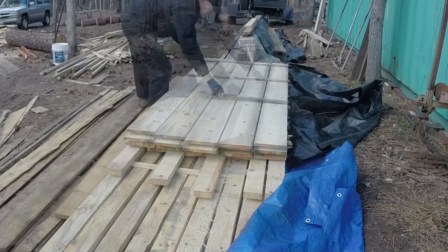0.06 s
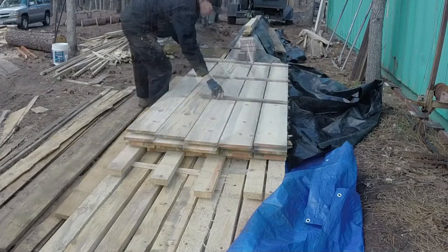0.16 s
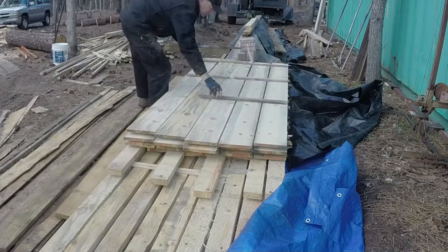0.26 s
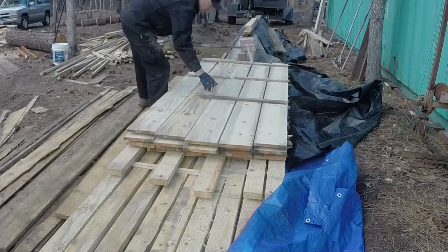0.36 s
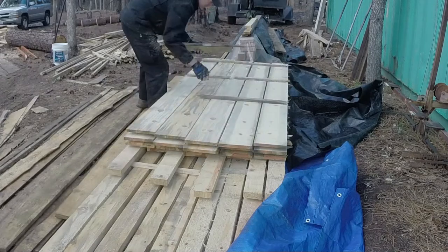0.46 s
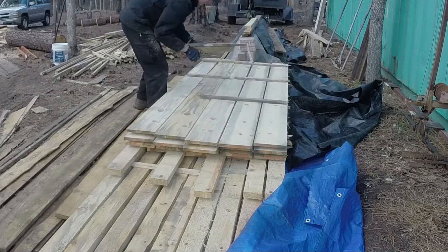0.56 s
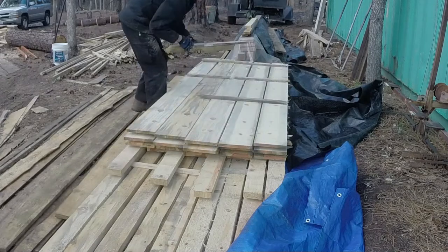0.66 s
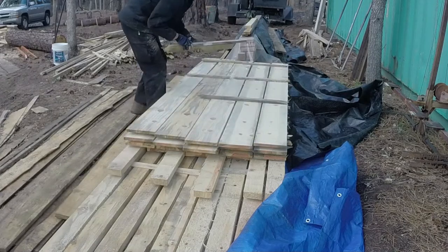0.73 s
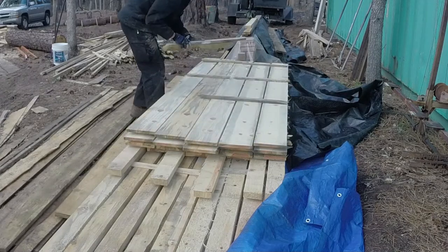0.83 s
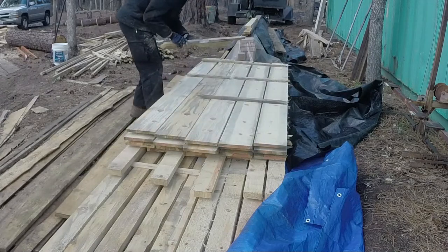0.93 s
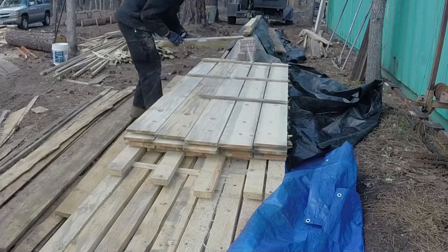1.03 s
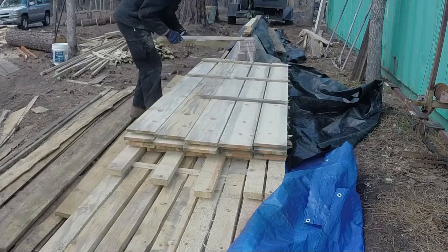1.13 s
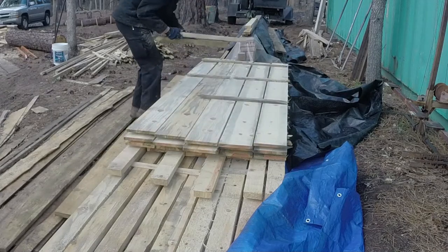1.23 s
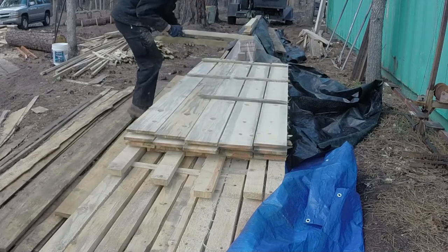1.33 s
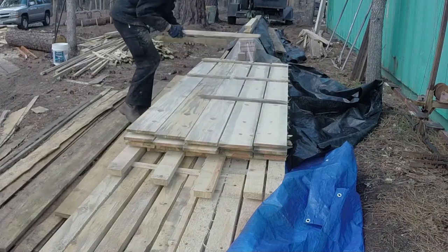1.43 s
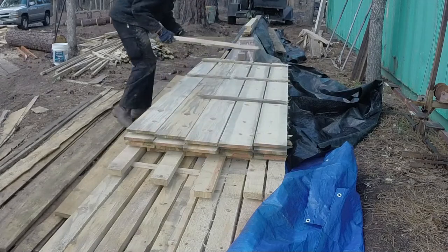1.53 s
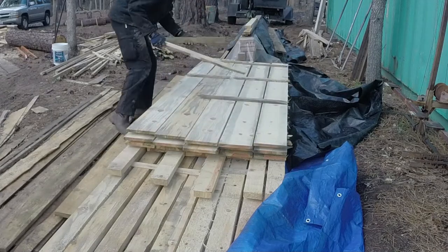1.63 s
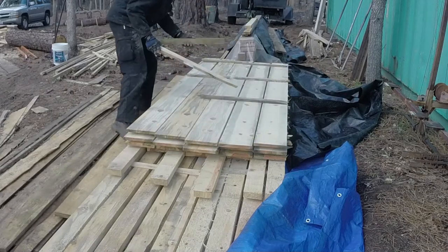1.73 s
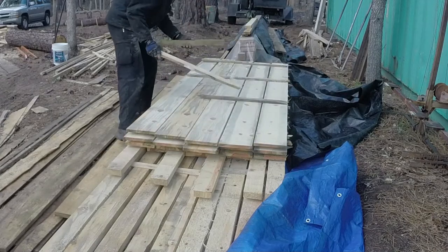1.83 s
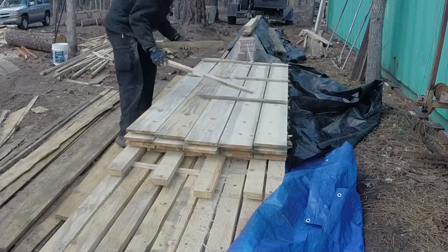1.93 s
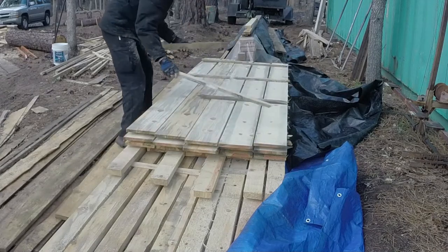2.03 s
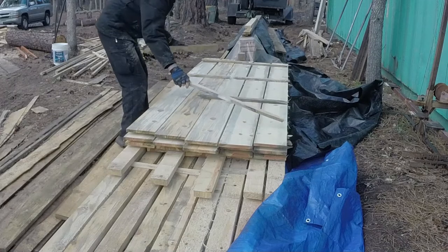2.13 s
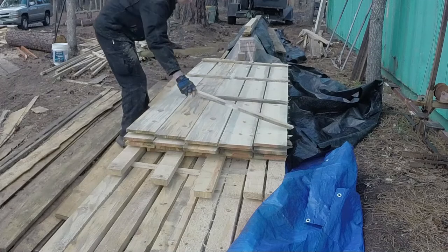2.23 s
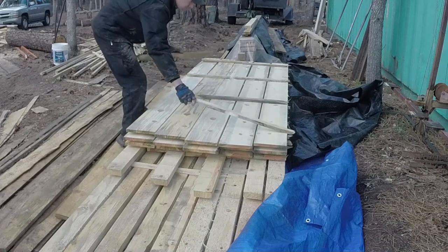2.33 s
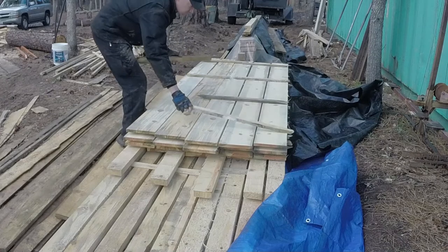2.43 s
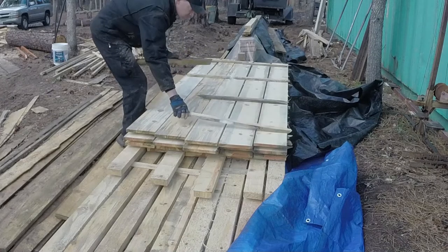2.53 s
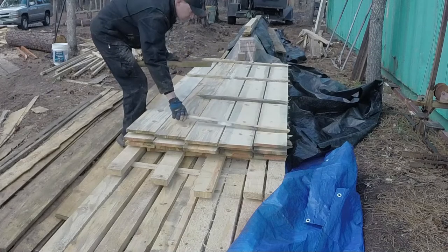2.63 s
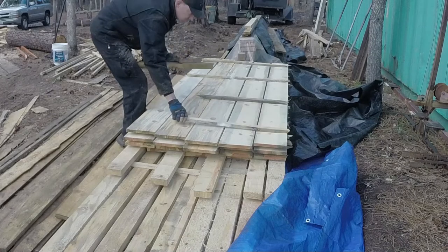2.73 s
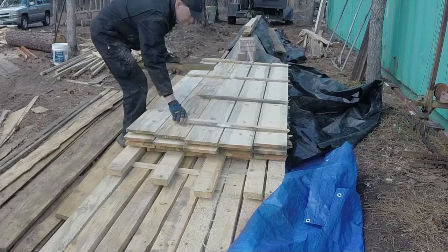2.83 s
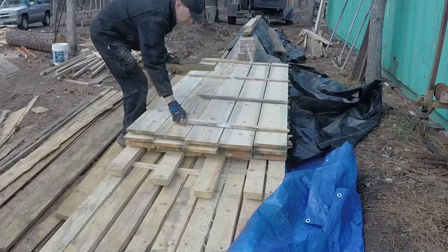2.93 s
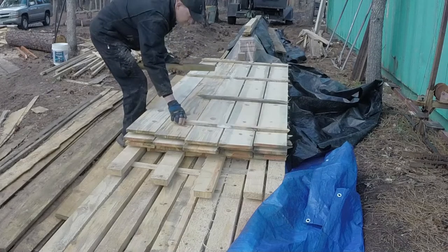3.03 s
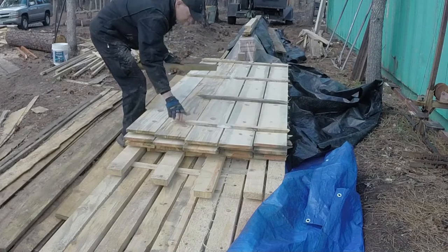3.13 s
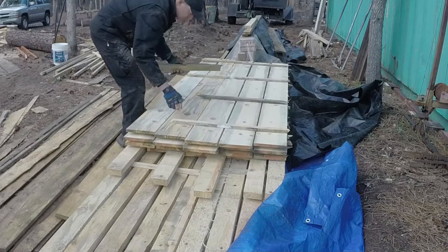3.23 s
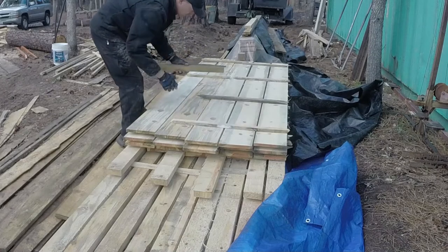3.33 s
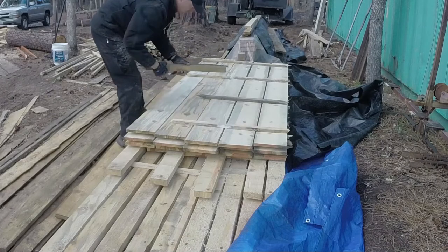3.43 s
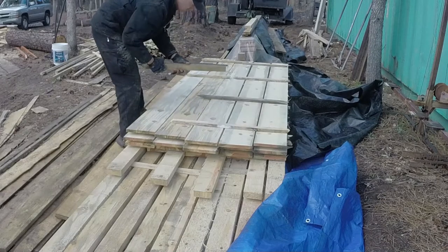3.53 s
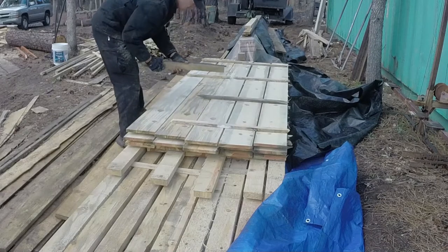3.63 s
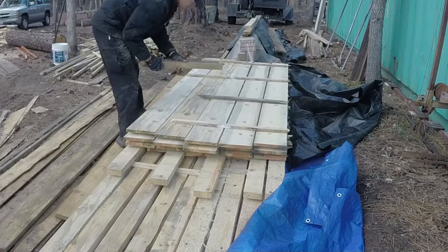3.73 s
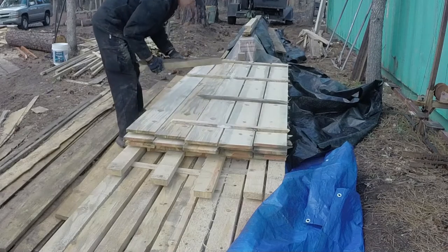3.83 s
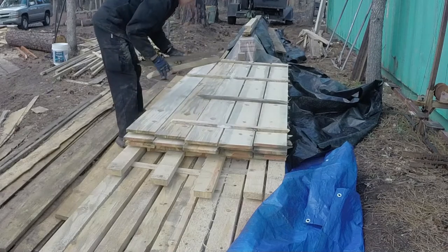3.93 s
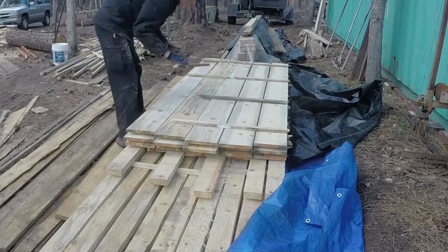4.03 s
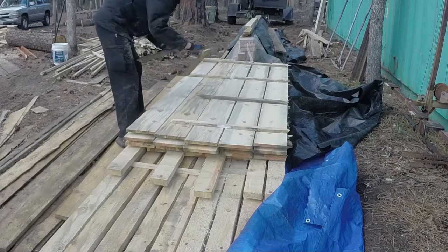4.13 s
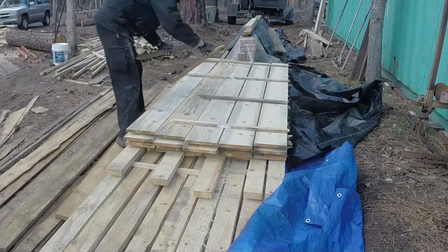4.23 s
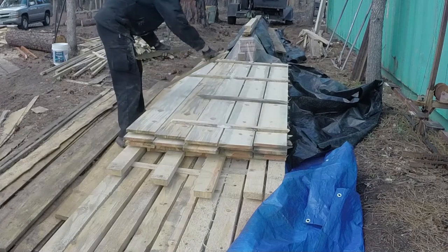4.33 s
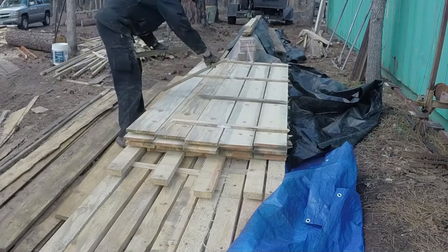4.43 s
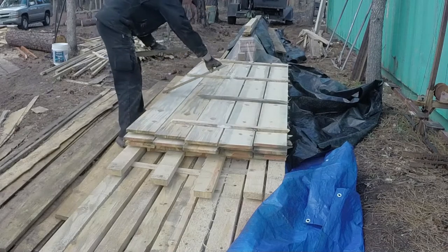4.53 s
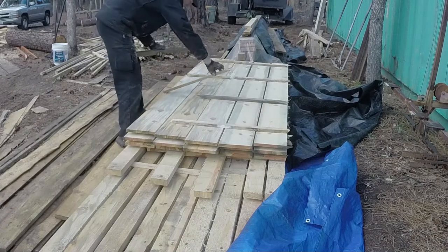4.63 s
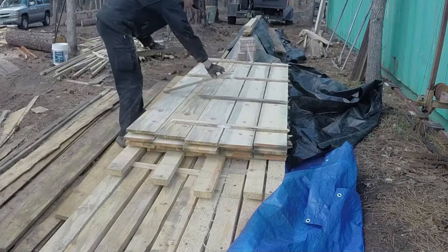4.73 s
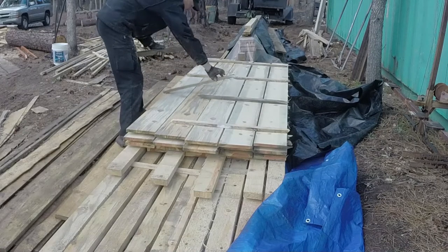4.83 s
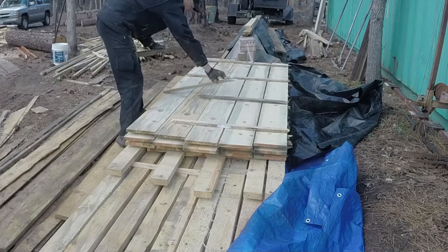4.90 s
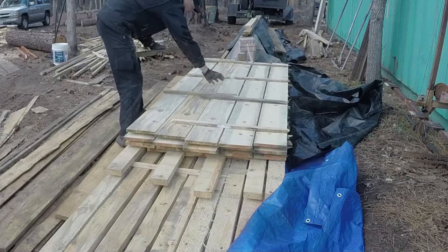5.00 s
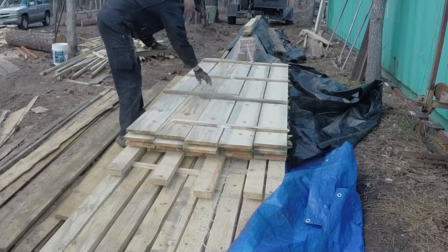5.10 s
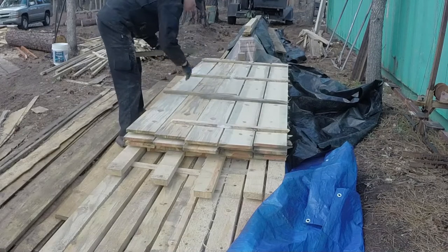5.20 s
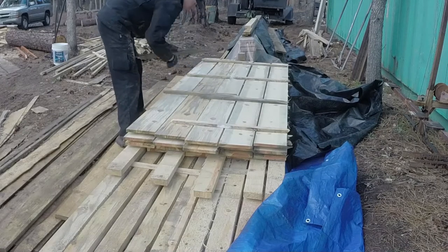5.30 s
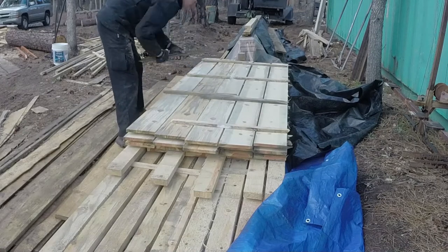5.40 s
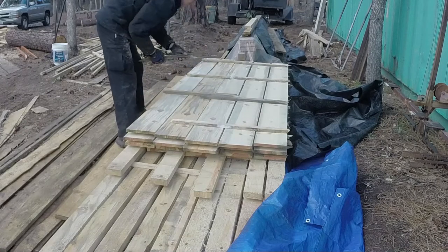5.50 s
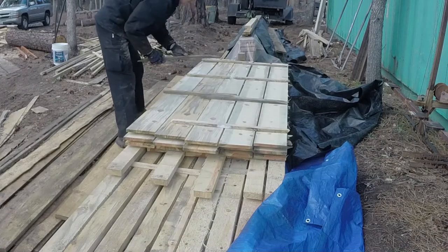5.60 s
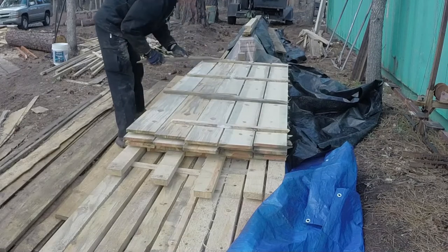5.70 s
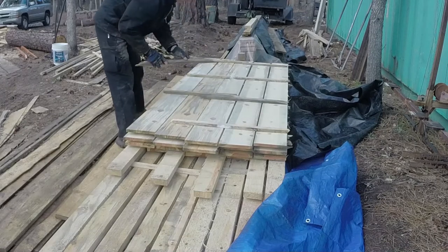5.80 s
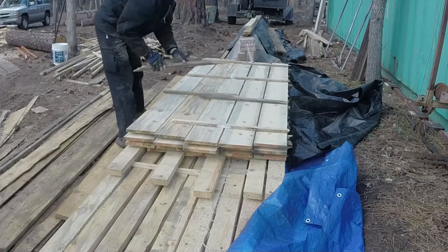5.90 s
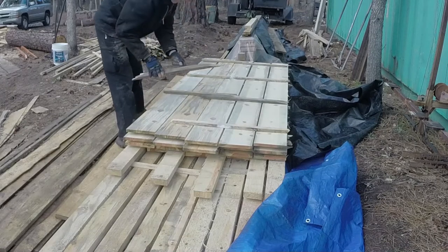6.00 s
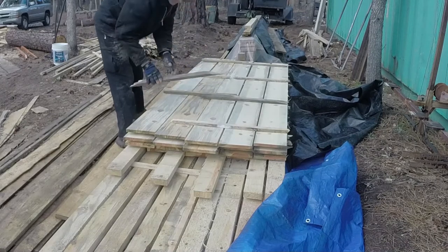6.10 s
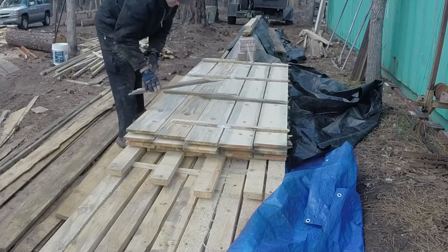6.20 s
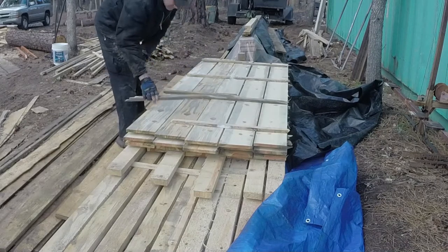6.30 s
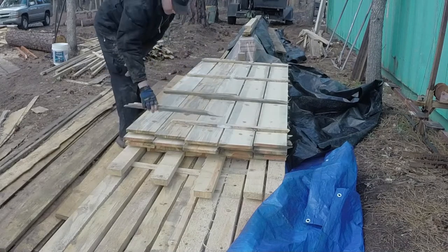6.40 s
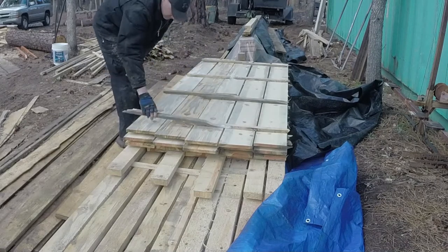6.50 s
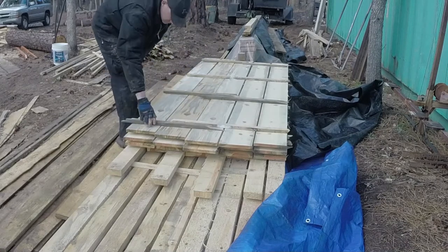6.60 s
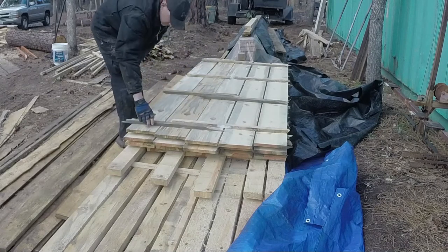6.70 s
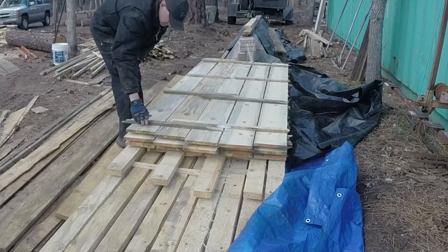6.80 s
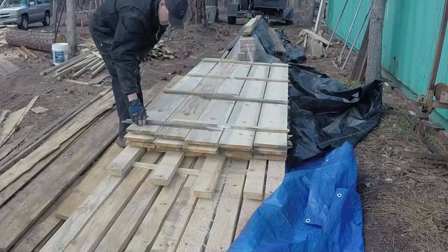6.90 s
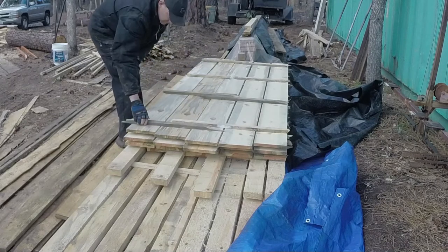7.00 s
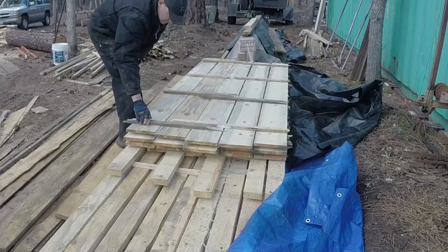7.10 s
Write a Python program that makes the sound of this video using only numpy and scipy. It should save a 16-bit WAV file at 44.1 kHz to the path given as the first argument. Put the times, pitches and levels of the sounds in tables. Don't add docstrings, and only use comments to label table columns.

```python
import sys
import numpy as np
from scipy import signal
from scipy.fft import rfft, irfft
from scipy.io import wavfile
from scipy.ndimage import uniform_filter1d

SR = 44100
rng = np.random.default_rng(int(sys.argv[2]) if len(sys.argv) > 2 else 0)


def inscribe(sig):
    pcm = np.round(np.clip(np.atleast_2d(sig).T, -1, 1) * 32767)
    wavfile.write(sys.argv[1], SR, pcm.astype(np.int16))


def magnitude_from_level(level_db):
    exponent = np.asarray(level_db, float) / 20
    return 10 ** exponent


N = 315315

# modes_db, scatter_db (against the push), scatter_t60_s, left_minus_right_db, left_late_samples
STRIP_PRESSED = ([(.2438, -36, .6), (.2455, -13, 0.45), (.2515, -19, 0.8), (.2585, -33, .5, 400),
                 (.266, -26, 0.4, 680)], [(35, -56), (70, -6), (388, -1.5), (669, 0), (935, -19.5),
                 (1110, -20), (3000, -43), (11000, -94)], [(133, -2, 0.16), (301, 0, .1), (441, -3, .11),
                 (668, -7, .07), (1012, -22, .12), (1314, -26, .08), (1572, -28, .1), (2013, -34, .065)],
                 (-7, -6, 0.15, -2.3, -1.5))
STRIP_DROPPED = ([(2.0166, -26, .08, 3600), (2.0177, -15, 0.15, 1200), (2.0198, -12.5, 1.2),
                 (2.031, -25, 0.2, 1200), (2.0455, -20, 0.4, 650), (2.059, -31, .3, 900)], [(35, -59),
                 (90, -15), (300, -2), (520, -8), (1250, -14), (1780, -25), (4200, -25), (9000, -80)],
                 [(200, -11, .15), (264, -2, 0.14), (404, 0, 0.09), (538, -6, 0.15), (727, -12, 0.12),
                 (845, -12, 0.058), (1066, -26, .1), (1238, -24, .08), (1960, -28, .074), (2471, -32, .1),
                 (2832, -33, .064)], (-6, -9, 0.18, -1, -8.5))
STRIP_NUDGED = ([(3.081, -39, .8), (3.0855, -32, 0.5), (3.0925, -37, .5, 750), (3.122, -34.5, 0.5, 600),
                (3.135, -40, .7)], [(35, -49), (60, -11), (135, 4), (521, -0.5), (900, -7), (1190, -33),
                (4000, -55), (5500, -97)], [(124, -2, .15), (301, -3, 0.15), (484, -4, .064),
                (748, -5, 0.1), (1017, -14, 0.14)], (-2, 1, 0.13, -2, 0.5))
STRIP_TOUCHED = ([(4.5542, -34, 0.7), (4.5578, -34, .3, 500), (4.574, -38, 0.9), (4.582, -42, .5, 450)],
                 [(35, -46), (60, -9), (249, -6), (420, -10), (643, -12.5), (930, -29), (1600, -30),
                 (6000, -96)], [(121, -8, .15), (237, 0, 0.2), (517, -12, .12), (634, -10, 0.07),
                 (1195, -28, .1), (1513, -12, 0.04)], (-3, -4, 0.18, -1.5, 1.5))
STRIP_SLAPPED = ([(5.0763, -6, 0.22), (5.0815, -7, .1, 1500), (5.0862, -9, .12, 1350),
                 (5.0895, -10.5, .5, 600), (5.095, -13, .4, 700), (5.117, -23, 0.5, 650),
                 (5.129, -30, .2, 1400)], [(35, -60), (260, -4), (602, -10), (938, -15.5), (1530, -19),
                 (3000, -24), (5000, -50), (15000, -70)], [(150, -10, .12), (240, -5, .15), (330, -5, .08),
                 (619, -3, 0.12), (716, -4, 0.11), (877, -15, .12), (1012, -8, 0.06), (1130, -14, 0.12),
                 (1362, -2, .07), (1486, -2, .075), (1690, -6, .07), (2062, -25, 0.12), (2300, -28, .08),
                 (2896, -25, .057)], (-8, -11, 0.16, -2, 0.9))
STRIP_SLID = ([(6.6643, -13, 0.35), (6.668, -19, .2, 1100), (6.6755, -20, 0.2, 850), (6.6805, -20, .3, 680),
              (6.686, -21, 0.15), (6.6915, -27, .12, 1300), (6.6995, -26, 0.15, 1000), (6.7425, -29, .85)],
              [(35, -70), (70, -20), (379, -9), (694, -5), (1500, -13), (2570, -20), (3250, -22),
              (3800, -70)], [(226, -14, .15), (301, -10, .13), (382, -6, 0.15), (565, -4, .06),
              (684, -6, 0.1), (829, -10, 0.1), (1007, -7, 0.11), (1303, -9, 0.11), (1420, -20, 0.12),
              (1900, -24, .08), (2579, -20, 0.1)], (-8, -5, 0.115, -2, 1.3))
KNOCKS = [STRIP_PRESSED, STRIP_DROPPED, STRIP_NUDGED, STRIP_TOUCHED, STRIP_SLAPPED, STRIP_SLID]

# start_s, peak_db, pitch_hz, t60_s
TAPS = [
    (.785, -52, 920, 0.044),
    (.895, -41, 314, .03),
    (5.0765, -25, 109.6, 0.11),
    (1.945, -52, 650, .03),
    (2.402, -44.5, 324, 0.034),
    (3.49, -55.5, 600, .04),
    (4.433, -51.5, 350, 0.037),
    (6.403, -54, 420, .04),
    (6.611, -51.5, 1870, 0.041),
    (7.095, -56.5, 818, 0.021),
]
# start_s, peak_db, pitch_hz
THUDS = [(0.558, -48, 57.3), (0.635, -47, 99.6), (0.655, -40.5, 130), (0.707, -36.5, 70.0),
         (0.779, -42, 162), (1.028, -46.5, 52), (1.439, -40.5, 69.6), (1.582, -46.5, 74), (2.15, -33, 58.7),
         (2.172, -45, 51.7), (2.32, -49.5, 53), (3.326, -47, 68), (3.355, -44, 229), (3.479, -49, 119),
         (3.594, -42.5, 88.6), (3.999, -51, 88.8), (4.09, -47, 99), (4.248, -39.5, 104), (4.432, -42, 58.4),
         (5.465, -35.5, 83), (5.868, -48, 70.6), (5.897, -48.5, 72), (6.169, -44.5, 168),
         (6.232, -42.5, 70), (6.312, -36, 87), (6.344, -47, 50.6), (6.429, -41, 85), (6.519, -50, 56.5)]
# start_s, peak_db, pitch_hz, t60_s
TICKS = [(.325, -62, 4000, .02), (.41, -62, 5200, .01), (.422, -61, 7500, .01), (.724, -61, 9400, .015),
         (0.9333, -58, 8500, .024), (2.0168, -44, 5200, .015), (2.039, -55, 6500, .02),
         (2.103, -51, 3250, .01), (2.1035, -52, 9500, .02), (2.1809, -49, 3860, .015),
         (2.187, -55, 5960, .02), (2.4004, -58, 8000, .02), (3.0864, -45, 5800, .024),
         (3.0866, -55, 10500, .02), (3.3513, -44, 7700, .024), (3.5428, -54, 9000, .04),
         (3.5887, -56, 6900, .012), (3.589, -58, 3600, .012), (3.615, -60, 7000, .03),
         (3.724, -60, 3200, .01), (3.736, -61, 4600, .01), (3.7993, -56, 6550, .02),
         (3.8142, -51, 8400, .024), (4.4802, -55, 6740, .02), (4.817, -57, 8340, .02),
         (4.9186, -53.5, 6400, .02), (4.999, -46, 5940, .015), (5.0765, -39, 5000, .025),
         (5.077, -43, 8500, .03), (5.0772, -52, 12500, .025), (5.3901, -59, 3560, .02),
         (5.4171, -49, 5890, .015), (6.1509, -53, 3700, .02), (6.17, -60.5, 7750, .02),
         (5.475, -61, 12200, .024), (5.61, -60, 8900, .024), (6.6109, -53, 8760, .024),
         (6.7456, -46, 5800, .024)]
# peak_s, rise_s, fall_s, level_db
GRATE_SLIPS = [
    [(3.803, .003, 0.036, -69), (3.85, .012, .05, -69), (3.892, 0.05, .005, -65)],
    [(6.612, .001, .02, -60), (6.667, .001, .004, -43), (6.675, .002, .005, -33),
     (6.694, 0.013, 0.0025, -38), (6.705, 0.0046, 0.035, -55.5)],
]
# start_s, length_s, top_hz, end_hz, level_db
SQUEAKS = [(2.57, .061, 11700, 11300, -79), (2.735, .045, 11600, 11300, -81),
           (2.817, 0.044, 10400, 9900, -82), (3.541, .028, 5600, 5500, -65), (3.541, .022, 6900, 6800, -72),
           (6.434, .05, 7700, 7700, -79), (6.462, .11, 6440, 6170, -73), (6.498, 0.081, 9500, 9100, -74),
           (6.747, 0.11, 11900, 9900, -87.5), (6.787, 0.063, 15600, 15000, -81),
           (6.95, 0.043, 10400, 10200, -84.5), (6.937, 0.078, 15550, 14500, -80)]
# peak_s, rise_s_per_10db, fall_s_per_10db, cloth_db, sliding_wood_db
REACHES = [(.33, .02, .1, -78, -72), (.42, .05, .1, -76, -68), (.55, .12, .1, -67.5, -62),
           (.635, .06, .05, -65.5, -61), (.82, .13, .03, -73, -66), (.945, .015, .12, -72, -72),
           (1.38, .2, .15, -65.5, -65), (1.55, .04, .12, -65, -67), (1.96, .05, .1, -76, -66),
           (2.14, .05, .14, -72, -61), (2.39, .1, .05, -70, -55), (2.555, .07, .15, -73, -72),
           (3.37, .13, .08, -68, -61), (3.56, .08, .13, -70, -65), (3.93, .1, .1, -76, -68),
           (4.2, .15, .15, -78, -68), (4.46, .5, .1, -73, -64), (4.76, .15, .14, -69, -66),
           (1.11, .02, .2, -74, -70), (5.2, .25, .15, -67, -58), (5.58, .4, .03, -71, -68),
           (5.99, .12, .05, -70, -62), (6.3, .3, .4, -73, -63), (6.62, .02, .02, -70, -58),
           (6.84, .1, .04, -72, -67)]
# peak_s, rise_s, fall_s, level_db
SLEEVE_DRAWS = [(.205, .012, .01, -69), (.225, 0.01, 0.008, -69), (.56, .08, .05, -69),
                (.63, .04, .07, -67), (2.62, 0.11, 0.88, -75.5), (3.86, .02, .25, -72),
                (6.5, 0.36, 0.3, -68.5)]
# peak_s, rise_s, fall_s, level_db
WEIGHT_SHIFTS = [(.36, 0.13, 0.034, -56), (.66, 0.28, 0.24, -52.5), (.88, 0.11, 0.065, -51.5),
                 (1.42, 0.61, 0.52, -62), (1.985, 0.036, 0.13, -48.5), (2.148, 0.039, 0.12, -44),
                 (2.408, 0.018, 0.055, -43.5), (3.05, 0.044, 0.24, -58.5), (3.38, .1, 0.26, -50.5),
                 (4.0, .1, 0.9, -57), (4.55, 0.23, 0.04, -60), (5.2, 0.18, 0.23, -56.5),
                 (5.5, 0.16, 0.011, -45.5), (5.92, 0.054, 0.35, -50.5), (6.3, 0.06, 0.19, -45.5),
                 (6.78, .15, 0.027, -46.5), (7.15, 0.045, .1, -91)]
# peak_s, rise_s, fall_s, level_db
NYLON_BRUSHES = [(.222, .015, .012, -79), (1.31, .05, .1, -75), (1.43, .08, .05, -73), (5.25, .2, .12, -77)]

# pitch_hz, level_db (per Hz)
GRATE_COLOUR = [(2530, -47.5), (4300, -12), (5270, -5.5), (7250, -6), (8230, -9.5), (14200, -19.5),
                (16000, -18)]
CLOTH_COLOUR = [(1650, -28), (2800, -5.5), (4800, -1.5), (7120, -1.5), (11700, -8), (12500, -10),
                (16000, -17.5)]
HOLLOW_COLOUR = [(700, -75), (1400, -12.5), (1900, -8), (2150, -5), (2450, -12), (3600, -13.5), (6000, -66)]
SLIDE_COLOUR = [(80, -60.5), (280, -10.5), (420, -1), (800, -7), (1300, -9.5), (3000, -69.5)]
WEIGHT_COLOUR = [(15, -13.5), (40, -4), (70, -1), (180, -5.5), (300, -11), (900, -80.5)]
YARD_COLOUR = [(12, -32.5), (20, 8), (123, -1), (499, -4.5), (1700, -25), (4670, -31), (11900, -36.5),
               (12300, -65.5)]
NYLON_COLOUR = [(7500, -40), (9500, -6), (11000, 0), (12200, -8), (14000, -40)]
# pitch_hz, left_minus_right_db
PORT_LEAN = [(40, 7.5), (150, 1.5), (500, -0.1), (1300, 1), (4400, -6), (9000, -5)]
# pitch_hz, likeness_0_to_1
PORT_LIKENESS = [(40, .85), (300, 0.92), (1400, 1), (4000, 0.29), (12000, 0.23)]


def evened(x):
    return x / np.sqrt(np.mean(x ** 2) + 1e-20)


def peaked(x):
    return x / (abs(x).max() + 1e-20)


def read(points, hz):
    f, value = np.transpose(points)
    return np.interp(np.log(hz + 1), np.log(f + 1), value)


def add(mix, start_s, sound):
    part = mix[..., round(start_s * SR):][..., :sound.shape[-1]]
    part += sound[..., :part.shape[-1]]


def push(colour):
    hz = abs(np.fft.fftfreq(4096, 1 / SR))
    log_gain = np.log(magnitude_from_level(np.maximum(read(colour, hz), -90)))
    return np.fft.ifft(np.exp(np.conj(signal.hilbert(log_gain)))).real[:2048]


def swells(rows, t):
    power = 0
    for peak_s, rise_s, fall_s, db in rows:
        before = (peak_s - t) / max(rise_s, .001)
        after = (t - peak_s) / max(fall_s, .001)
        power = power + magnitude_from_level(2 * (db - 10 * np.maximum(before, after)))
    return 10 * np.log10(power + 1e-13)


def noise(colour, level_db, patchy_db, flicker_db):
    frames, hz = N // 128 + 5, np.fft.rfftfreq(512, 1 / SR)
    a, b, c, d, patches = rng.standard_normal((frames, len(hz), 5)).T
    patches = uniform_filter1d(patches, size=6, axis=0)
    patches = evened(uniform_filter1d(patches, size=16, axis=1))
    flicker = evened(uniform_filter1d(rng.standard_normal(frames), size=3))
    same = np.clip(read(PORT_LIKENESS, hz), 0, 1)[:, None]
    left = a + 1j * b
    right = same * left + np.sqrt(1 - same ** 2) * (c + 1j * d)
    level = read(colour, hz)[:, None] + patchy_db * patches + flicker_db * flicker
    spectra = np.array([left, right]) * magnitude_from_level(level)
    sound = signal.istft(spectra, nperseg=512, noverlap=384)[1][:, :N]
    return magnitude_from_level(level_db) * evened(sound)


def yard():
    return noise(YARD_COLOUR, -62, 0.37, .4)


def movement():
    t = np.arange(0, N / SR + .01, .001)
    cloth = swells([(*row[:3], row[3]) for row in REACHES], t)
    slide = swells([(*row[:3], row[4]) for row in REACHES], t)
    cloth_share, hollow_db = 0.71, -1
    hollow = cloth_share * cloth + (1 - cloth_share) * slide + hollow_db
    hollow = 10 * np.log10(magnitude_from_level(2 * hollow) + magnitude_from_level(2 * swells(SLEEVE_DRAWS, t)))
    weight = swells(WEIGHT_SHIFTS, t)
    cloth, hollow, slide, weight = (np.interp(np.arange(N) / SR, t, db)
                                    for db in (cloth, hollow, slide, weight))
    return (noise(CLOTH_COLOUR, cloth, 1.3, 1.3) + noise(HOLLOW_COLOUR, hollow, 1.5, 1.4)
            + noise(SLIDE_COLOUR, slide, 1.4, 1.4) + noise(WEIGHT_COLOUR, weight - 2.5, 1.5, 3.5))


def nylon():
    return noise(NYLON_COLOUR, swells(NYLON_BRUSHES, np.arange(N) / SR), 2.5, 1.5)


def squeaks():
    out = np.zeros(N)
    start_share, top_place = .97, .4
    for start, length, top_hz, end_hz, db in SQUEAKS:
        u = np.arange(0, 1, 1 / (SR * length))
        rising = u < top_place
        away = np.where(rising, u / top_place - 1, (u - top_place) / (1 - top_place)) ** 2
        hz = top_hz - away * np.where(rising, top_hz * (1 - start_share), top_hz - end_hz)
        wobble = uniform_filter1d(rng.standard_normal((2, SR // 4)), size=200)
        wobble = evened(wobble)[:, :len(u)]
        tone = np.sin(2 * np.pi * np.cumsum(hz * (1 + .009 * wobble[0])) / SR)
        add(out, start, magnitude_from_level(db + 2.5 * wobble[1]) * tone * signal.windows.tukey(len(u), .3))
    return out


def thuds():
    out = np.zeros(N)
    for s, db, hz in THUDS:
        turns = np.arange(0, 3, hz / SR)
        swing = np.sin(2 * np.pi * turns) * np.minimum(turns / 0.3, 1) * np.exp(-turns / 0.62)
        add(out, s, -magnitude_from_level(db) * peaked(swing))
    return out


def bursts(rows, width, grain):
    out, t = np.zeros(N), np.arange(SR // 8) / SR
    for s, db, hz, t60 in rows:
        drive = grain * rng.standard_normal(len(t)) * magnitude_from_level(-60 * t / max(t60, .003))
        drive[0] = 1
        edges = np.clip([hz / width, hz * width], 20, 17000)
        band = signal.butter(2, edges, "bandpass", fs=SR, output="sos")
        add(out, s, magnitude_from_level(db) * peaked(signal.sosfilt(band, drive)))
    return out


def ticks():
    return bursts(TICKS, 1.2, 0.2)


def taps():
    return bursts(TAPS, 1.174, 0.1)


def grate(mix, slips):
    start = slips[0][0] - .01
    t = start + np.arange(SR // 4) / SR
    snaps_per_s, uneven_db, apart, left_db = 4200, 4, 0.41, -3.5
    snaps = (rng.random(len(t)) < snaps_per_s / SR) * magnitude_from_level(uneven_db * rng.exponential(1, len(t)))
    dust = rng.standard_normal((3, len(t)))
    grit = snaps * rng.choice([-1., 1.], len(t)) + 0.24 * dust[0] + apart * dust[1:]
    grit = evened(signal.fftconvolve(grit, push(GRATE_COLOUR)[None], axes=1)[:, :len(t)])
    level = swells(slips, t) + [[left_db / 2], [-left_db / 2]]
    add(mix, start, magnitude_from_level(level) * grit)


def wood_ring(modes, t60, t):
    strike = rng.standard_normal(len(modes))
    ring = np.zeros(len(t))
    for (hz, db, mode_t60), side in zip(modes, strike):
        ring += magnitude_from_level(db - 60 * t / min(mode_t60, t60)) * np.sin(2 * np.pi * hz * t) * np.sign(side)
    return ring


def stack_scatter(pulse, t60, t):
    treble_hz, treble_t60 = 1900, .09
    sizes, chance = rng.standard_normal((3, len(t))), rng.random((3, len(t)))
    echoes = sizes * (chance < .08)
    echoes = echoes[0] + 0.33 * echoes[1:]
    dull = signal.lfilter(*signal.butter(2, treble_hz, fs=SR), echoes)
    echoes = dull * magnitude_from_level(-60 * t / t60) + (echoes - dull) * magnitude_from_level(-60 * t / treble_t60)
    echoes *= np.minimum(t / 0.0029, 1)
    return signal.fftconvolve(echoes, pulse[None], axes=1)[:, :len(t)]


def knock(mix, contacts, colour, modes, shares):
    modes_db, scatter_db, t60, left_db, late = shares
    t = np.arange(SR // 3) / SR
    pulse = peaked(push(colour))
    for s, db, ms, *spot_hz in contacts:
        ring = wood_ring(modes, t60, t)
        echoes = stack_scatter(pulse, t60, t)
        sound = magnitude_from_level(modes_db) * peaked(ring) + magnitude_from_level(scatter_db) * peaked(echoes)
        sound[:, :len(pulse)] += pulse
        if spot_hz:
            spot_q, spot_t60 = 1.5, .17
            sound = signal.lfilter(*signal.iirpeak(spot_hz[0], spot_q, fs=SR), sound)
            sound = sound * magnitude_from_level(-60 * t / spot_t60)
        force = np.sin(np.pi * np.clip((t + .5 / SR) * 1000 / max(ms, .03), 0, 1)) ** 2
        sound = peaked(signal.fftconvolve(sound, force[None, :256], axes=1)[:, :len(t)])
        left = np.interp(t - max(late, 0) / SR, t, sound[0], left=0)
        right = np.interp(t - max(-late, 0) / SR, t, sound[1], left=0)
        add(mix, s, magnitude_from_level(db) * np.array([left * magnitude_from_level(left_db / 2), right / magnitude_from_level(left_db / 2)]))


def scene():
    mix = yard() + movement() + nylon()
    mix = mix + squeaks() + thuds() + ticks() + taps()
    for slips in GRATE_SLIPS:
        grate(mix, slips)
    for strip in KNOCKS:
        knock(mix, *strip)
    return mix


def gate(x):
    gate_hz, gate_db = 12050, -110
    hz, _, z = signal.stft(x, SR, nperseg=1024)
    power = uniform_filter1d((abs(z) ** 2).mean(0), size=16, axis=0)
    power = uniform_filter1d(power, size=3, axis=1)
    kept = (hz[:, None] < gate_hz) | (power > magnitude_from_level(2 * gate_db))
    return signal.istft(z * kept, SR, nperseg=1024)[1][:, :N]


def band_limit(x):
    return signal.sosfilt(signal.butter(12, 16340, fs=SR, output="sos"), x)


def record(dry):
    left_late_samples, edge_hz = 4.36, 15750
    hz = np.fft.rfftfreq(N, 1 / SR)
    lean = magnitude_from_level(read(PORT_LEAN, hz) / 2)
    left = lean * np.exp(-2j * np.pi * hz * left_late_samples / SR)
    ports = np.array([left, 1 / lean]) * (hz < edge_hz)
    finished = gate(irfft(rfft(dry) * ports, N))
    return band_limit(finished)


dry = scene()
out = record(dry)
inscribe(out)
```